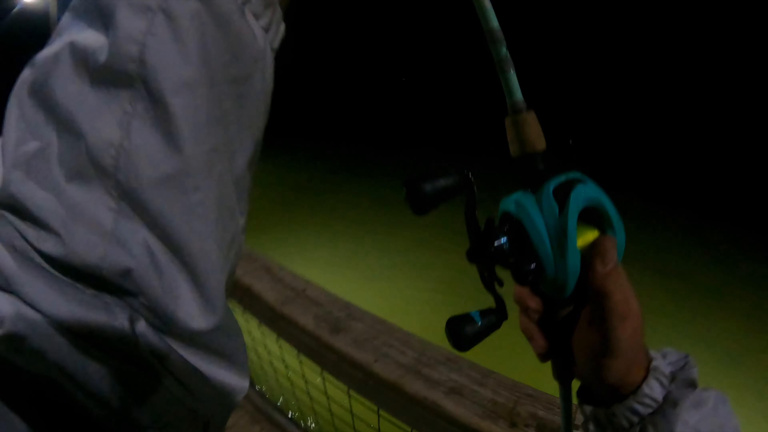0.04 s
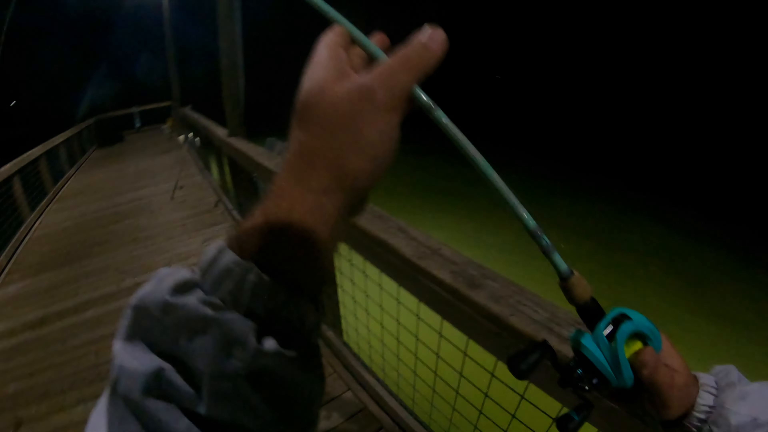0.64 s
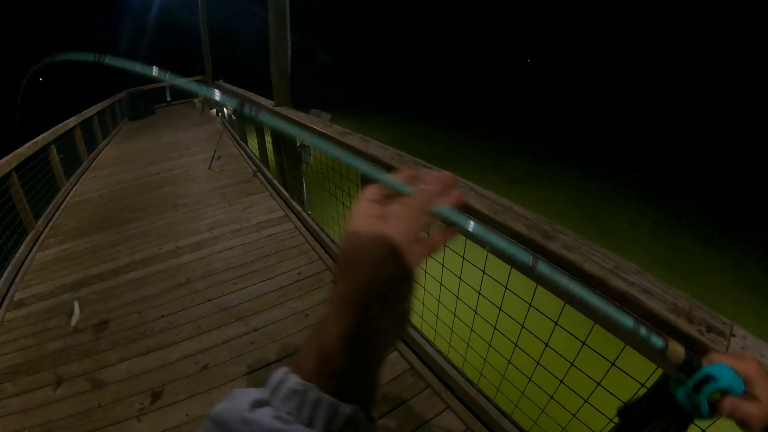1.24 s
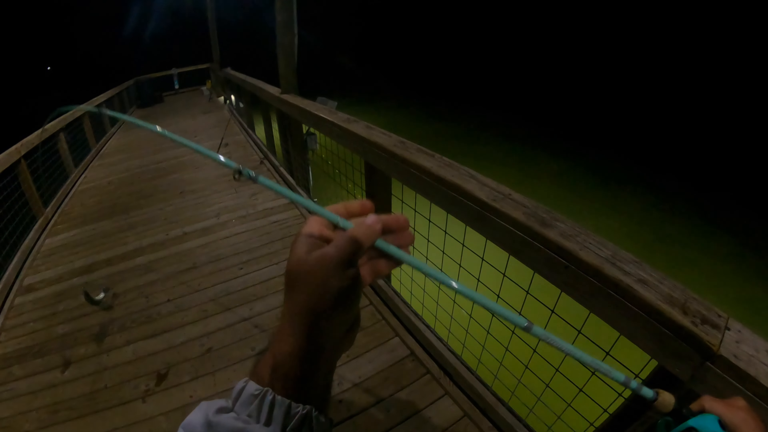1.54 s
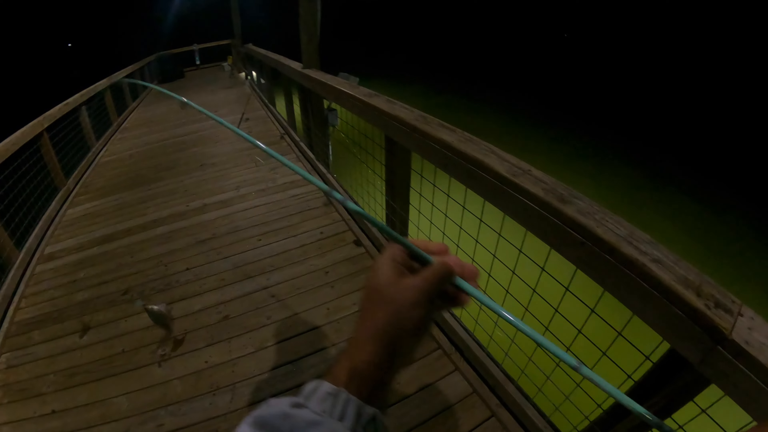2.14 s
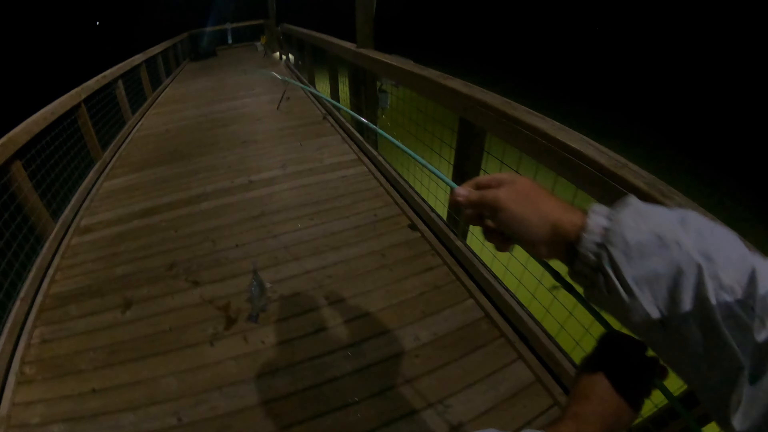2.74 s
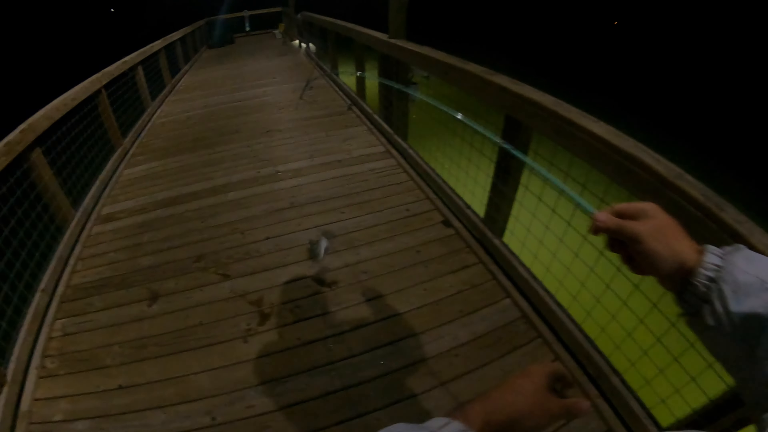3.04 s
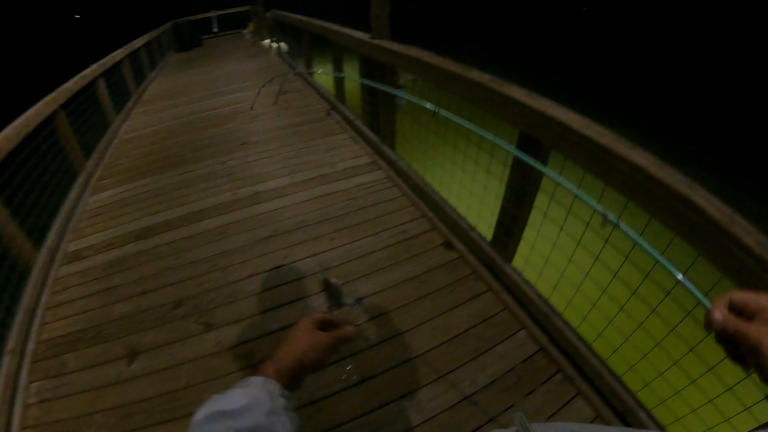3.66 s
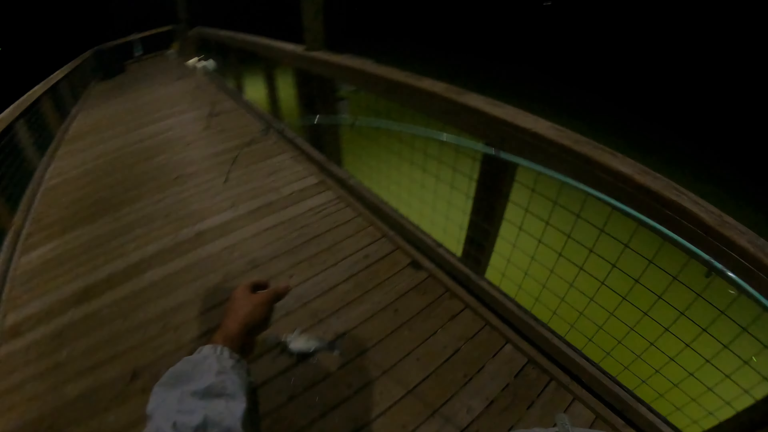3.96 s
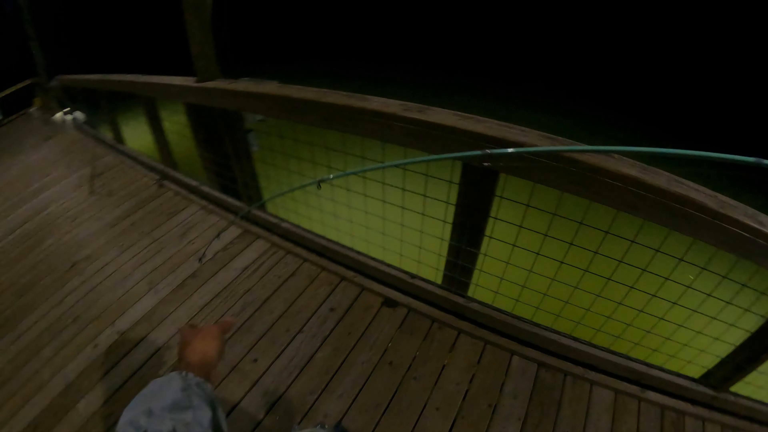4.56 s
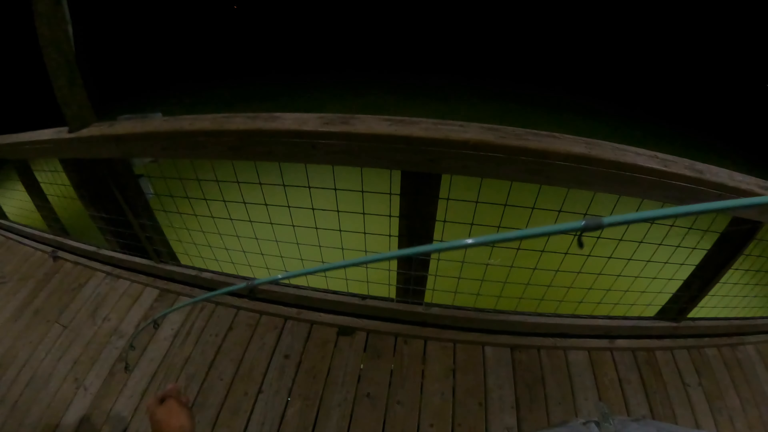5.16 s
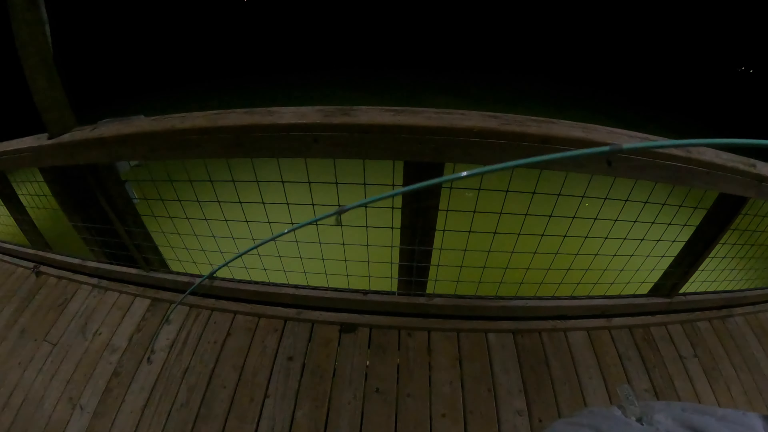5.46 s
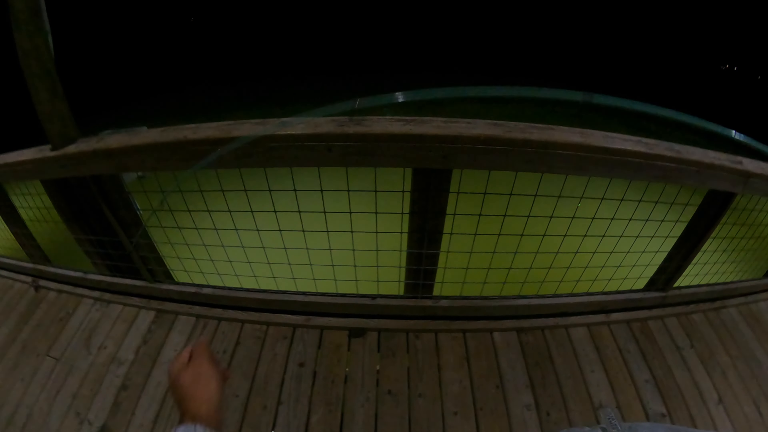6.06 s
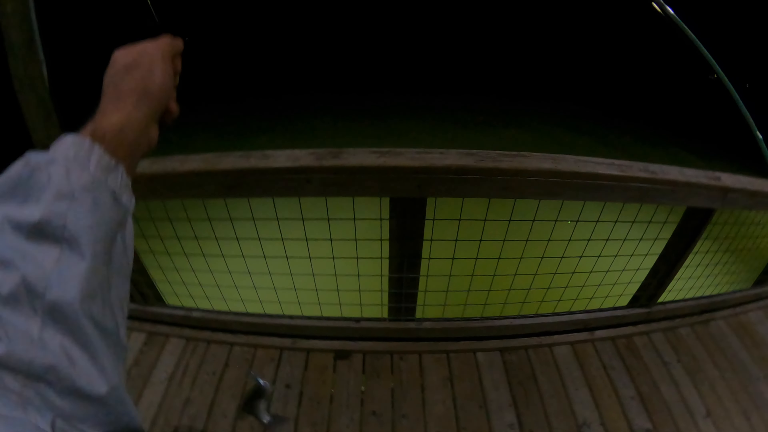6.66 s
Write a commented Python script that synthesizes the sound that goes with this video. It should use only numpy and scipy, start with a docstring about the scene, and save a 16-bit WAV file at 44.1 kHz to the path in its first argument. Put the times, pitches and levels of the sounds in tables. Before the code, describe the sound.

Outdoors on a quiet wooden pier, a chest-worn microphone picks up uneven low wind rumble and soft cloth swishing. A plastic lure clicks faintly around 0.6 seconds. From about 0.9 to 3.7 seconds a nylon jacket crackles in crisp, close bursts, with a few light taps on the boards early on. At 2.5 seconds a small fish and a rod butt hit the deck with a loud, hollow clatter. Another slap lands at 3 seconds, followed by a sharp lure clack and a quick fading rattle. The fish slaps again near 3.6 seconds and briefly drums its tail. Dull body jolts and gusts buffet the microphone, strongest around 2.7 and from 3.9 to 4.4 seconds. Soft sleeve swishes follow as the wind fades, and one small knock comes at 5.6 seconds. After a lull, the jacket crackles again from 6.2 to 6.8 seconds.

```python
"""A small fish, swung onto a wooden pier at night, slaps the boards and drums them with its tail.
The lure ticks in its mouth and the rod butt is set down hard; heavy impacts excite the modes of the
deck and the air beneath it. The angler's nylon jacket crackles by stick-slip friction beside a
chest microphone, while moving air and body jolts rumble as pressure swings at its two ports."""
import sys
import numpy as np
from scipy import signal
from scipy.fft import rfft, irfft, next_fast_len
from scipy.io import wavfile
from scipy.ndimage import uniform_filter1d

SR = 44100
rng = np.random.default_rng(int(sys.argv[2]) if len(sys.argv) > 2 else 0)


def wav_out(sig):
    """Save sig, one row per channel (or a flat mono array), as 16-bit PCM at SR to the path in sys.argv[1]."""
    wavfile.write(sys.argv[1], SR, np.round(np.clip(np.atleast_2d(sig).T, -1, 1) * 32767).astype(np.int16))


N = 299958
TIME, BINS = np.arange(N) / SR, np.fft.rfftfreq(4096, 1 / SR)

# Levels are relative; pan is left minus right; tilt is in dB per octave.
# still air over the water: f/Hz, level/dB
NIGHT_SPECTRUM = [(30, -6), (200, -12.5), (290, -2), (420, -11), (570, -15), (850, -29.5), (15000, -61)]
# swish of loose cloth: t/s, level/dB
SWISH_LEVEL = [(0.0, -60.5), (0.64, -53.5), (1.29, -55.5), (1.82, -62.5), (2.39, -55), (2.58, -48),
               (2.97, -51), (3.22, -47), (3.35, -54), (4.3, -61.5), (4.47, -67.5), (4.92, -59),
               (5.7, -69.5), (6.17, -70.5), (6.55, -61), (6.8, -63.5)]
# its spectrum: f/Hz, level/dB
CLOTH_SPECTRUM = [(150, -8), (500, -5.5), (800, -7.5), (1150, -3.5), (2000, -7.5), (2800, -9.5),
                  (4200, -7.5), (5500, -8), (7200, -11.5), (10000, -20.5), (15000, -38)]
# its brightness, high while the sleeve is near: t/s, tilt/(dB/octave)
SWISH_TILT = [(0, 0), (.35, 2), (.7, -1), (2.3, -1), (3.8, 1), (4.65, -4.5), (4.9, -6.5), (5.2, -3.5),
              (5.8, -5.5), (6.2, -3), (6.8, -2)]
# the sleeve sweeps past as the arm reaches out: t/s, length/s, level/dB
SWEEPS = [(4.665, 0.079, -57), (5.158, 0.047, -60), (6.125, .025, -63.5), (6.4, 0.039, -58)]
# light air that always passes the ports: t/s, level/dB
BREEZE_LEVEL = [(0, -43), (1.7, -41), (2.4, -33), (3.5, -37.5), (4.6, -31), (5.35, -37.5), (5.65, -50),
                (6.8, -44.5)]
# gusts as the body moves: t/s, length/s, rumble/dB, flutter/dB
GUSTS = [(0.412, 0.3, -27, -48.5), (0.857, 0.31, -23.5, -38.5), (1.183, .32, -31, -45.5),
         (1.802, 0.053, -21, -37.5), (2.004, 0.12, -26, -47), (2.21, 0.06, -23.5, -47),
         (2.47, 0.27, -35.5, -43), (2.736, 0.045, -17.5, -32), (2.997, 0.13, -28, -44),
         (3.337, .08, -35.5, -44), (3.575, 0.43, -38.5, -49), (3.913, .22, -19, -29.5),
         (4.147, 0.32, -29, -35), (4.634, 0.27, -29, -41), (5.132, 0.092, -30, -43),
         (6.412, 0.12, -38, -55)]
# slow eddies: f/Hz, level/dB
RUMBLE_SPECTRUM = [(10, -11), (28, 1), (70, -2.5), (110, -9.5), (170, -19), (260, -28.5), (500, -59.5),
                   (1200, -94.5)]
# fast eddies: f/Hz, level/dB
FLUTTER_SPECTRUM = [(70, -0.5), (160, 9), (280, -0.5), (420, -8.5), (650, -17.5), (1000, -32), (2000, -45),
                    (5000, -67)]
# a gust breaking up on a port: f/Hz, level/dB
SCUFF_SPECTRUM = [(90, -9), (180, 21.5), (290, 7), (450, -4), (950, -10.5), (1400, -35), (3000, -40.5),
                  (8000, -58.5)]
# crisp nylon crackle: f/Hz, level/dB
CRACKLE_SPECTRUM = [(880, -52), (1500, -28), (2240, -19.5), (3410, -8), (3980, -9.5), (4840, -1.5),
                    (5500, 2), (6560, -4.5), (7370, -3), (8210, -8.5), (10200, -14), (11200, -21.5),
                    (12600, -23), (14500, -34.5), (15500, -53.5)]
# sleeve strokes, nylon sliding on nylon: t/s, length/s, level/dB
STROKES = [(0.045, .06, -49.5), (0.842, 0.14, -50.5), (0.962, 0.11, -39), (1.053, 0.16, -50),
           (1.315, 0.096, -36.5), (1.394, 0.14, -32.5), (1.547, .11, -38), (1.69, 0.18, -50),
           (1.902, 0.073, -47), (2.012, 0.035, -30.5), (2.117, 0.043, -33.5), (2.172, 0.055, -42.5),
           (2.315, .04, -41), (2.388, 0.045, -36.5), (2.499, 0.061, -32.5), (2.578, .06, -35.5),
           (2.65, 0.083, -36), (2.787, 0.16, -41.5), (2.894, .075, -32), (3.083, 0.14, -34),
           (3.25, 0.034, -31.5), (3.329, .15, -36), (3.526, 0.064, -38), (3.639, 0.089, -50.5),
           (4.103, .045, -52.5), (4.234, .03, -53.5), (4.317, 0.023, -51.5), (6.212, 0.34, -49),
           (6.401, 0.11, -37.5), (6.541, 0.19, -53.5), (6.75, 0.043, -38.5)]
# creases giving way: peak t/s, level/dB, fall/s, ring f/Hz
CREASES = [(.078, -36, 0.011, 5500), (0.934, -23, 0.0032, 5050), (0.98, -28, 0.0093, 5200),
           (1.004, -24.5, .02, 5170), (1.105, -26, 0.012, 5450), (1.338, -27.5, 0.015, 5360),
           (1.357, -19.5, 0.0085, 6200), (1.42, -23.5, 0.019, 5800), (1.461, -29, 0.0077, 5500),
           (1.499, -24, 0.013, 5760), (1.613, -32.5, 0.0084, 6000), (1.847, -22.5, 0.01, 5400),
           (1.884, -21.5, .02, 5540), (2.002, -26, 0.012, 4770), (2.083, -20, 0.012, 5670),
           (2.109, -27, 0.0053, 5590), (2.388, -23, 0.018, 5380), (2.439, -23, 0.013, 6130),
           (2.532, -28.5, 0.022, 5460), (2.68, -26, 0.013, 5480), (2.925, -26, 0.011, 5100),
           (3.122, -26, 0.021, 5400), (3.152, -24.5, 0.021, 5100), (3.226, -31, 0.011, 4530),
           (3.273, -30, 0.0058, 5390), (3.294, -24, 0.0086, 4600), (3.332, -28, 0.014, 6200),
           (3.521, -30, 0.0067, 5170), (3.536, -31, 0.0056, 4900), (3.572, -26.5, 0.012, 4900),
           (3.687, -30.5, 0.0039, 5400), (4.096, -40.5, 0.0037, 6560), (6.319, -39, 0.026, 5170),
           (6.436, -20, 0.011, 5470), (6.447, -21.5, 0.012, 5000), (6.51, -27.5, 0.016, 5170),
           (6.758, -34, .005, 5300), (6.773, -25.5, 0.0052, 5300), (6.798, -18.5, .006, 4970)]
# brightness of the crackle: t/s, tilt/(dB/octave)
CRACKLE_TILT = [(.1, 0), (1, 5.5), (1.45, 2.5), (1.87, 4.5), (2.6, 0.5), (3.1, 1), (3.55, -1.5), (4.1, 9),
                (4.4, 4), (6.2, -3.5), (6.8, -3)]
# how differently the ports hear the jacket: f/Hz, side minus mid/dB
JACKET_WIDTH = [(2000, -2.5), (5400, -15), (8000, -12.5), (13000, -6)]
# position of the moving sleeve: t/s, pan/dB
SLEEVE_PAN = [(.8, 2), (1.35, 5), (2.85, 2), (3.05, 0.8), (6.8, -1.5)]
# single clacks of lure and hooks: t/s, level/dB, f/Hz
LURE_CLACKS = [(0.575, -37, 920), (.708, -41, 3720), (0.7552, -35, 1240), (.755, -43.5, 2800),
               (1.73, -50, 2620), (1.991, -44.5, 1390), (2.3582, -35.5, 3530), (3.0567, -25.5, 3400),
               (3.352, -41.5, 1170), (3.864, -43, 9300)]
# fish and rod butt hitting the boards:
# t/s, level/dB, tilt/(dB/octave), hard crack/dB, deck boom/dB, hollow thud/dB, pan/dB
IMPACTS = [(0.9332, -34, 2, -8, -63.5, -43.5, 14), (2.481, -19, -1.5, -2.5, -33, -53, 3),
           (2.486, -13.5, 1, 4.5, -21, -33, 3.5), (2.4884, -22, 5, 1.5, -22, -38, -4.5),
           (2.524, -46, -2, 0.5, -22.5, -42, 1), (3.0223, -28.5, 2, -6, -48.5, -55, 11),
           (3.0268, -19.5, 3, -6.5, -38, -27, -2), (3.5649, -21, 5, -2.5, -39.5, -37, -4),
           (3.685, -33.5, -4.5, 1, -49, -44, -14), (5.6189, -37.5, -7, 7, -51, -53, 3)]
# a slap on wood: f/Hz, level/dB
SLAP_SPECTRUM = [(80, -3.5), (300, 6), (560, -11), (1120, 0.5), (1900, -10.5), (2900, -1.5), (3900, -4.5),
                 (4500, -12), (5400, -12), (7600, -13.5), (9000, -20), (14000, -45.5)]
# air under the boards: f/Hz, level/dB
CAVITY_SPECTRUM = [(150, -18.5), (330, 4.5), (520, -7.5), (720, -5), (900, -12.5), (1400, -13), (4000, -18),
                   (10000, -58.5)]
# modes of planks and joists: f/Hz, level/dB, T60/s
DECK_MODES = [(208.6, -5, .7), (236, -8.5, 0.54), (261.3, -2.5, 0.59), (295, -1.5, 0.24), (333, -6.5, 0.33),
              (555, -17, 0.17), (740, -16, .28), (1080, -20, .2)]
# flurries of the tail: t/s, number of taps, gap/s, level/dB
FLURRIES = [(1.269, 4, 0.013, -39), (2.003, 2, 0.024, -41), (3.7562, 4, .0167, -33.5), (4.273, 2, .04, -39)]
# one tap of the tail: f/Hz, level/dB
TAP_SPECTRUM = [(150, -15.5), (400, 4), (720, 7.5), (1100, -13.5), (2100, -12), (3200, -20.5), (5000, -17),
                (10000, -48.5)]
# jolts at the microphone: t/s, level/dB, f/Hz
JOLTS = [(1.449, -16.5, 69.6), (2.47, -15, 55), (2.715, -13, 71), (2.798, -11, 151), (3.225, -12, 44.2),
         (3.95, -12.5, 190), (4.062, -19, 170), (4.101, -17.5, 340), (4.288, -14, 123), (4.688, -24.5, 390)]
# puffs that strike a port squarely: t/s, length/s, level/dB
PUFFS = [(3.941, .02, -26.5), (3.968, 0.02, -22), (4.095, 0.015, -25), (4.668, 0.033, -37)]
# their rasp: f/Hz, level/dB
PUFF_SPECTRUM = [(90, 4), (200, 5), (400, -1), (950, -13.5), (1500, -34), (3000, -56), (8000, -69)]
# stereo width below the top treble: t/s, side gain/dB
STEREO_WIDTH = [(4.35, -0.5), (4.65, -8), (5.1, -35.5)]


def amp(db):
    """Amplitude ratio of a level in decibels."""
    return 10 ** (np.asarray(db) / 20)


def unit(x):
    """Normalisation to rms 1."""
    return x / np.sqrt(np.mean(x ** 2) + 1e-20)


def curve(rows, t=TIME):
    """Linear interpolation of a time table."""
    return np.interp(t, *np.transpose(rows))


def shape(points, hz=BINS):
    """Spectrum in dB, interpolated on a log-frequency axis."""
    f, db = np.transpose(points)
    return np.interp(np.log(hz + 1), np.log(f + 1), db)


def ring(db):
    """Minimum-phase impulse response of a spectrum, by the Hilbert transform."""
    log_gain = np.log(amp(np.maximum(db, db.max() - 100)))
    mirrored = np.concatenate([log_gain, log_gain[-2:0:-1]])
    return np.fft.ifft(np.exp(np.conj(signal.hilbert(mirrored)))).real[:2048]


def mode(hz, width_hz):
    """Magnitude response of a damped resonator."""
    return 1 / np.hypot(1, 2 * (BINS - hz) / width_hz)


def noise(points):
    """Stationary Gaussian noise filtered to a spectrum."""
    length = next_fast_len(N)
    gain = amp(shape(points, np.fft.rfftfreq(length, 1 / SR)))
    return unit(irfft(rfft(rng.standard_normal(length)) * gain, length)[:N])


def steadied(x, size):
    """Division by the running rms over size samples evens out the level."""
    return x / np.sqrt(abs(uniform_filter1d(x ** 2, size)) + 1e-9)


def peak_rms(x):
    """Rms of the loudest 4 ms of a transient."""
    return np.sqrt(uniform_filter1d(x ** 2, size=176, mode="constant").max())


def ports(mid, side, pan_db):
    """Left and right signals by sum and difference, panned by level."""
    return np.array([mid + side, mid - side]) * amp([[pan_db / 2], [-pan_db / 2]])


def add(mix, s, sound):
    """Superposition of a sound at time s."""
    part = mix[:, max(round(s * SR), 0):][:, :sound.shape[-1]]
    part += sound[..., :part.shape[1]]


def lumps(per_s):
    """Random modulation of rms 1, with per_s new values a second."""
    values = np.clip(rng.standard_normal(4096), -2, 2)
    return unit(np.interp(TIME * per_s, np.arange(len(values)), values))


def gesture(length, attack_s, sag_db, release_s):
    """Envelope: linear attack, a hold that changes by sag_db, exponential release."""
    t = np.arange(0, length + 6 * release_s, 1 / SR)
    hold = amp(sag_db * np.minimum(t / length, 1))
    return np.minimum(t / attack_s, 1) * hold * np.exp(-np.maximum(t - length, 0) / release_s)


def movements(rows, **envelope):
    """Incoherent movements add in power; rows are t/s, length/s, level/dB."""
    power = np.zeros((1, N))
    for s, length, db in rows:
        add(power, s, (amp(db) * gesture(length, **envelope)) ** 2)
    return np.sqrt(power[0])


def snaps(samples, per_s, spread_db, hiss):
    """Stick-slip friction: a Poisson train of uneven impulses over a fine hiss."""
    size = amp(spread_db * np.minimum(rng.exponential(1, samples), 4)) * rng.choice([-1, 1], samples)
    return unit(size * (rng.random(samples) < per_s / SR)) + hiss * rng.standard_normal(samples)


def night_air():
    """Ambient noise floor: faint, low and partly correlated between the ports."""
    return amp(-55.5) * ports(noise(NIGHT_SPECTRUM), .5 * noise(NIGHT_SPECTRUM), pan_db=3)


def swish():
    """Sliding friction of loose cloth gives broadband noise, brighter when the sleeve is near."""
    friction = [snaps(N, per_s=3000, spread_db=3.5, hiss=.79) for _ in range(2)]
    hz, t, spectra = signal.stft(friction, SR, nperseg=512)
    tilt_db = np.log2(np.maximum(hz, 1600) / 1600)[:, None] * curve(SWISH_TILT, t)
    spectra *= amp(shape(CLOTH_SPECTRUM, hz)[:, None] + tilt_db)
    mid, side = signal.istft(spectra, SR, nperseg=512)[1][:, :N]
    sweeps = movements(SWEEPS, attack_s=.022, sag_db=1, release_s=.096)
    return amp(15.5) * np.hypot(amp(curve(SWISH_LEVEL)), sweeps) * ports(mid, .3 * side, pan_db=.5)


def wind():
    """Turbulent pressure at the ports: slow eddies rumble, fast ones flutter in lumps."""
    gusts, breeze = np.array(GUSTS), amp(curve(BREEZE_LEVEL))
    envelope = dict(attack_s=.03, sag_db=-3, release_s=.05)
    slow = np.hypot(breeze, movements(gusts[:, [0, 1, 2]], **envelope))
    fast = np.hypot(amp(-16) * breeze, movements(gusts[:, [0, 1, 3]], **envelope))
    rumble = ports(steadied(noise(RUMBLE_SPECTRUM), 2200), .5 * noise(RUMBLE_SPECTRUM), pan_db=-2)
    flutter = ports(steadied(noise(FLUTTER_SPECTRUM), 1400), .51 * noise(FLUTTER_SPECTRUM), pan_db=-7.5)
    eddies_db = 3 * lumps(per_s=45)
    # the strongest gusts break up hoarsely on the right port
    scuff = ports(noise(SCUFF_SPECTRUM), .5 * noise(SCUFF_SPECTRUM), pan_db=-11.5)
    breakup = amp(-32.5 + eddies_db) * (fast / fast.max()) ** 1.78
    return slow * rumble + fast * amp(.88 * eddies_db) * flutter + breakup * scuff


def crackle(grip, hz, zing_db):
    """Stick-slip impulses make a crisp nylon crackle with a bright ring at hz; returns mid and side."""
    colour = ring(shape(CRACKLE_SPECTRUM) + zing_db * mode(hz, width_hz=300))
    slips = [steadied(snaps(len(grip), per_s=260, spread_db=2.2, hiss=.33), 550) for _ in range(2)]
    return np.array([signal.fftconvolve(slip * grip, colour) for slip in slips]) / np.linalg.norm(colour)


def sleeve_strokes():
    """Sliding friction crackles with a bright ring near 5.3 kHz and three fainter rings around it."""
    out = np.zeros((2, N))
    for s, length, db in STROKES:
        grip = gesture(length, attack_s=.0058, sag_db=.5, release_s=.023)
        zing_db = np.clip(7 - .3 * (db + 36.5), 3, 15)  # light strokes ring more purely
        main = crackle(grip, 5320 * (1 + .017 * rng.standard_normal()), zing_db)
        lesser_hz = 5100 * np.exp(.22 * rng.standard_normal(3))
        lesser = sum(crackle(grip, hz, zing_db=9.5) for hz in lesser_hz) / np.sqrt(3)
        add(out, s, amp(db) * (amp(-2.5) * main + amp(-3.5) * lesser))
    return out * amp(3 * lumps(per_s=90))  # the cloth catches and slips


def creases():
    """A crease lets go in a stick-slip burst: crisp nylon crackle with a bright ring near 5.4 kHz."""
    out = np.zeros((2, N))
    for s, db, fall, hz in CREASES:
        rise = .22 * fall
        t = np.arange(-2.5 * rise, 2.5 * fall + .004, 1 / SR)
        swell = np.exp(-abs(t / np.where(t < 0, rise, fall)) ** 1.2)
        zing_db = np.clip(9.5 - .29 * (db + 24.5), 4, 13)  # gentle snaps ring more purely
        colour = ring(shape(CRACKLE_SPECTRUM) + zing_db * mode(hz, width_hz=390))
        slips = [steadied(snaps(len(t), per_s=1600, spread_db=1.1, hiss=.24), 220) for _ in range(2)]
        burst = np.array([signal.fftconvolve(slip * swell, colour) for slip in slips])
        add(out, s + t[0], amp(db) * burst * np.sqrt(np.sum(swell ** 2) / np.sum(burst[0] ** 2)))
    return out


def jacket():
    """Time-varying filtering: peaks and notches wander through the crackle as the folds change shape."""
    hz, t, spectra = signal.stft(creases() + sleeve_strokes(), SR, nperseg=256)
    patches = uniform_filter1d(rng.standard_normal(spectra.shape[1:]), size=3, axis=0)
    wander_db = 3 * unit(uniform_filter1d(patches, size=16, axis=1))
    tilt_db = np.log2(np.clip(hz, 4100, 9000) / 5600)[:, None] * curve(CRACKLE_TILT, t)
    spectra *= amp(wander_db + tilt_db - 1.5)
    spectra[1] *= amp(shape(JACKET_WIDTH, hz))[:, None]
    mid, side = signal.istft(spectra, SR, nperseg=256)[1][:, :N]
    return ports(mid, side, 0) * amp(np.outer([.5, -.5], curve(SLEEVE_PAN)))


def blow(colour_db, splatter, splatter_s, echo, echo_s, pan_db, contact_s=.00045):
    """Impact excitation: brief contact, short splatter, faint reflections from deck and railings."""
    t = np.arange(SR // 4) / SR
    decay = np.exp(-t / contact_s) + splatter * np.exp(-t / splatter_s) + echo * np.exp(-t / echo_s)
    mid, side = decay * rng.choice([-1, 1], (2, len(t)))
    sound = signal.fftconvolve(ports(mid, .17 * side, pan_db), ring(colour_db)[None], axes=1)
    return sound / peak_rms(sound.mean(0))


def lure():
    """Each dry clack excites a low and a high resonance of the hollow plastic body."""
    out = np.zeros((2, N))
    for s, db, hz in LURE_CLACKS + rattle():
        colour = 20 * np.log10(mode(hz, .48 * hz) ** 2 + .18 * mode(1.5 * hz, 1.1 * hz) ** 2)
        clack = blow(colour, splatter=.25, splatter_s=.0017, echo=.031, echo_s=.017, pan_db=1.5)
        add(out, s, amp(db) * clack)
    return out


def deck_impacts():
    """Fish and rod butt excite the damped modes of the deck and the air cavity under it."""
    out, t = np.zeros((2, N)), np.arange(SR) / SR
    octaves = np.log2(np.clip(BINS, 550, 7500) / 550)
    crack = mode(hz=2860, width_hz=680)  # rings when something hard meets the plank
    for s, db, tilt, crack_db, boom_db, thud_db, pan_db in IMPACTS:
        colour = shape(SLAP_SPECTRUM) + tilt * octaves + crack_db * crack
        slap = blow(colour, splatter=.086, splatter_s=.002, echo=.19, echo_s=.01, pan_db=pan_db)
        add(out, s, amp(db) * slap)
        burst = rng.standard_normal(len(t)) * np.exp(-t / .03)
        thud = signal.fftconvolve(burst, ring(shape(CAVITY_SPECTRUM)))
        add(out, s, ports(amp(thud_db) * thud / peak_rms(thud), 0, pan_db=3))
        boom = sum(amp(level - 60 * t / t60) * np.sin(2 * np.pi * (hz * t + rng.random()))
                   for hz, level, t60 in DECK_MODES)
        boom *= 1 - np.exp(-t / .003)
        add(out, s, ports(amp(boom_db) * boom / peak_rms(boom), 0, pan_db=0))
    return out


def tail_drumming(ends_db=-2.5):
    """Light impacts of the tail each excite one plank; longer flurries swell toward the middle."""
    out = np.zeros((2, N))
    colour = shape(TAP_SPECTRUM)
    for start, taps, gap, db in FLURRIES:
        for k in range(taps):
            off_centre = (2 * k + 1) / taps - 1
            tap = blow(colour, splatter=.22, splatter_s=.0028, echo=.03, echo_s=.025, pan_db=-6.5)
            add(out, start + k * gap, amp(db + ends_db * off_centre ** 2) * tap)
    return out


def jolts():
    """A body jolt is one pressure pulse, shaped as the second derivative of a Gaussian."""
    out = np.zeros((2, N))
    for s, db, hz in JOLTS:
        u = np.arange(-4, 4, np.pi * hz / SR)
        pulse = (1 - 2 * u ** 2) * np.exp(-u ** 2)
        add(out, s - 4 / (np.pi * hz), ports(amp(db - 2) * pulse, 0, pan_db=-5))
    return out


def rattle(count=8, start_s=3.191, gap_s=.019, gap_ratio=.9, db=-33, step_db=-2.3, hz=1332):
    """The lure's clacks quicken and fade in geometric progression: t/s, level/dB, f/Hz."""
    k = np.arange(count)
    gaps = gap_s * gap_ratio ** k
    pitches = hz * (1 + .058 * rng.standard_normal(count))
    return list(zip(start_s + np.cumsum(gaps) - gaps, db + step_db * k, pitches))


def puffs():
    """Air striking a port squarely makes a short, hoarse burst of turbulence."""
    force = movements(PUFFS, attack_s=.012, sag_db=-6, release_s=.0042)
    return force * ports(steadied(noise(PUFF_SPECTRUM), 500), .56 * noise(PUFF_SPECTRUM), pan_db=-13)


def scene():
    """Superposition of quiet air, jacket and wind at the microphone, and impacts on the deck."""
    return (night_air() + jacket() + swish() + wind() + jolts() + puffs()
            + deck_impacts() + tail_drumming() + lure())


def record(dry, wide_above_hz=7500, edge_hz=15600):
    """Mid-side filtering closes all but the top treble to mono late on; a low-pass limits the band."""
    mid, side = dry.mean(0), (dry[0] - dry[1]) / 2
    top = signal.sosfiltfilt(signal.butter(6, wide_above_hz, "high", fs=SR, output="sos"), side)
    narrowed = ports(mid, top + amp(curve(STEREO_WIDTH)) * (side - top), 0)
    low_pass = signal.firwin(511, edge_hz, window=("kaiser", 9), fs=SR)
    return signal.oaconvolve(narrowed, low_pass[None], "same", axes=1)


dry = scene()
out = record(dry)
wav_out(out)
```